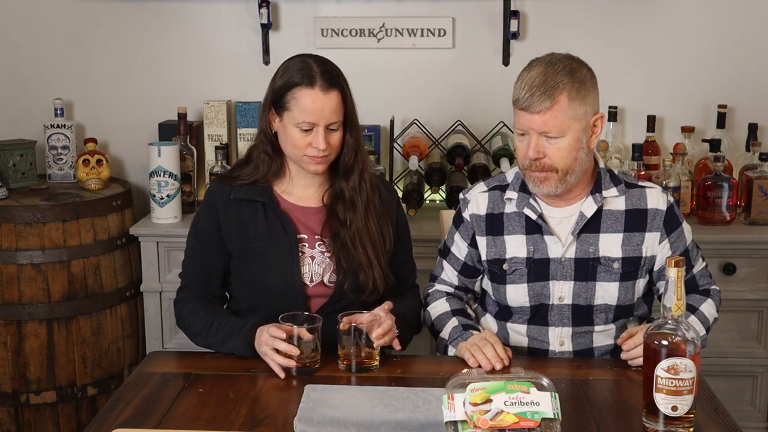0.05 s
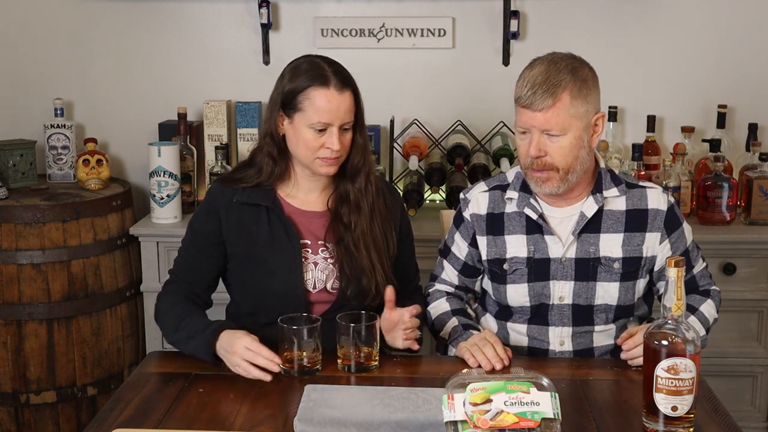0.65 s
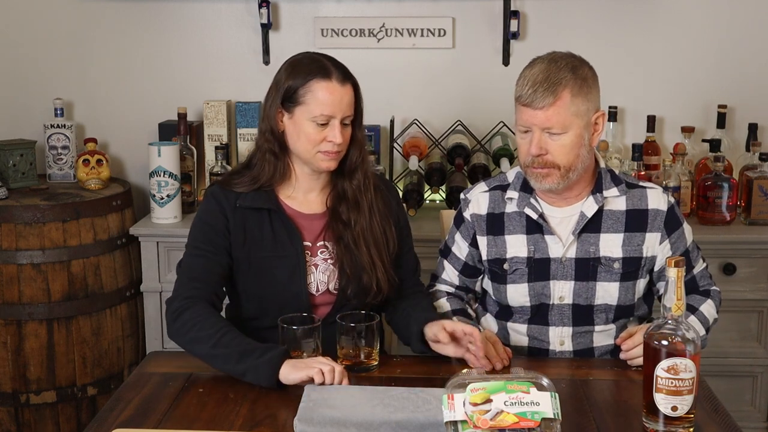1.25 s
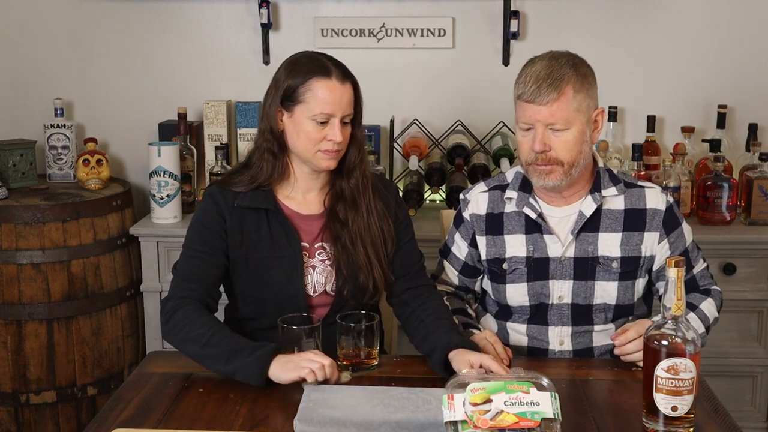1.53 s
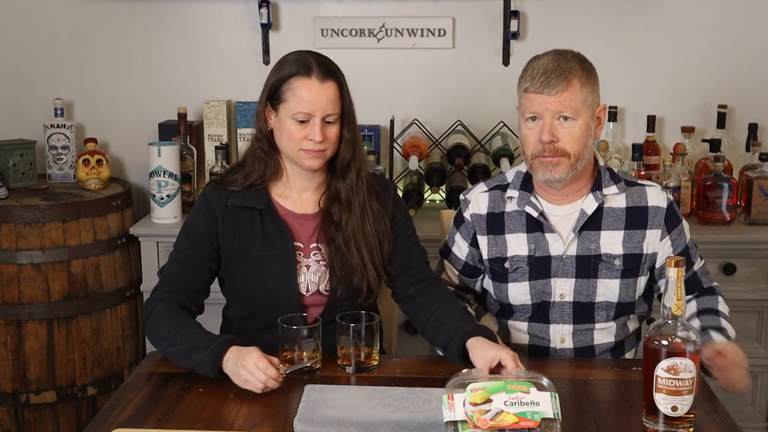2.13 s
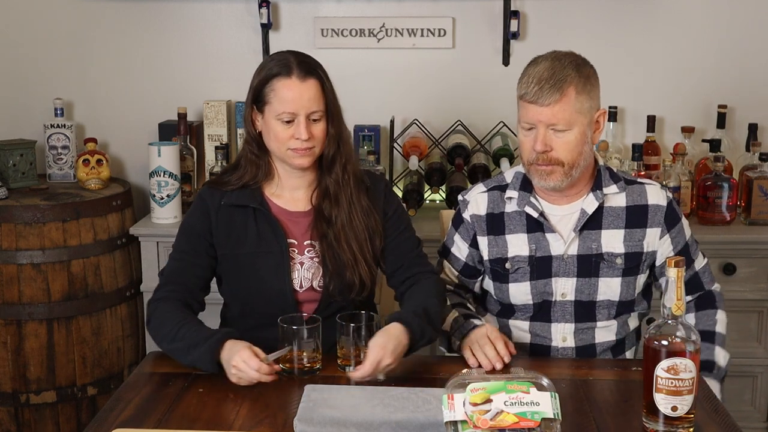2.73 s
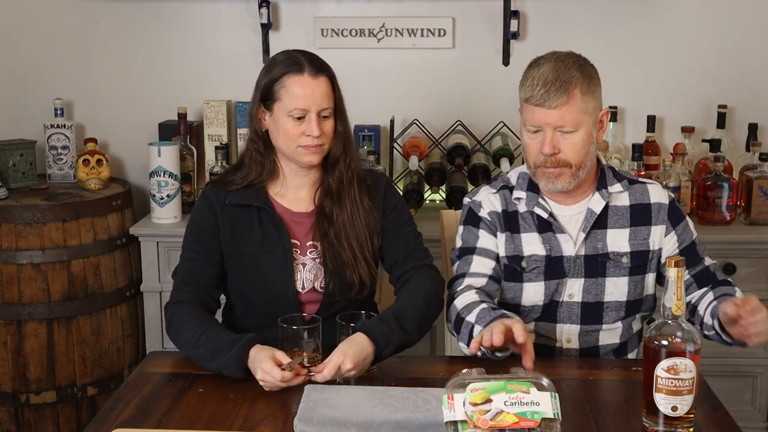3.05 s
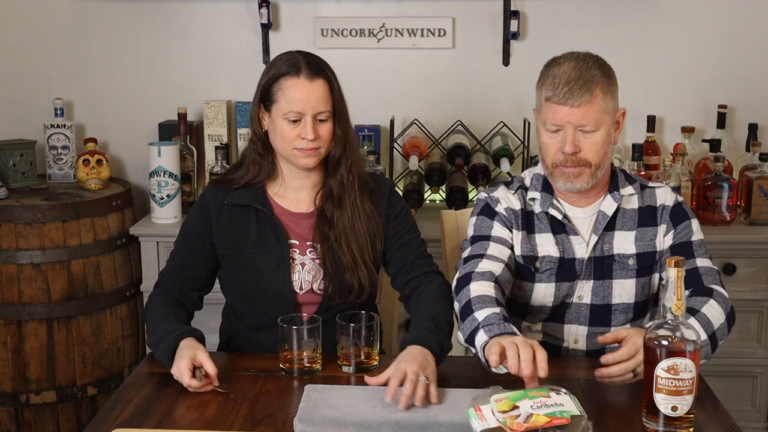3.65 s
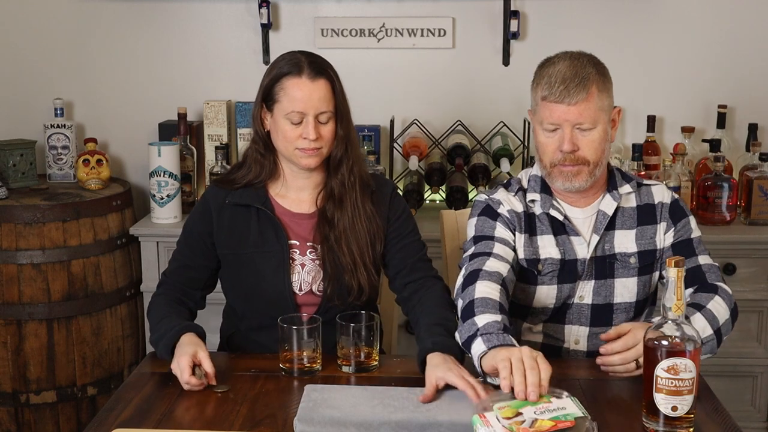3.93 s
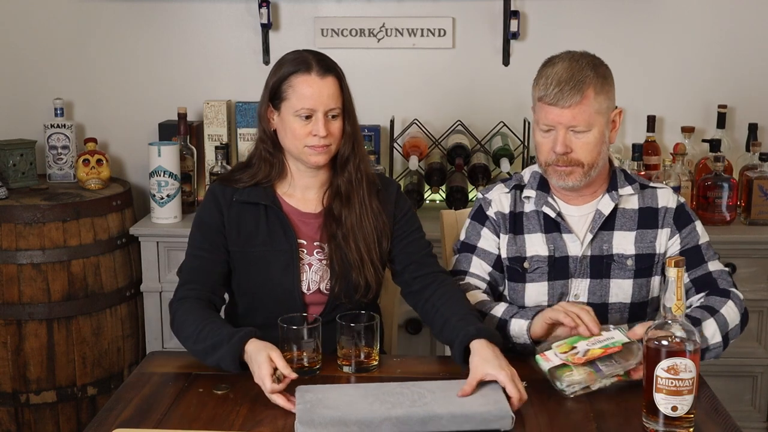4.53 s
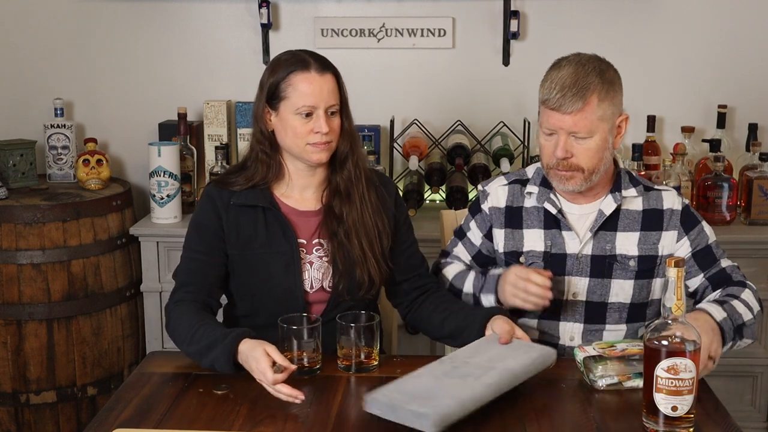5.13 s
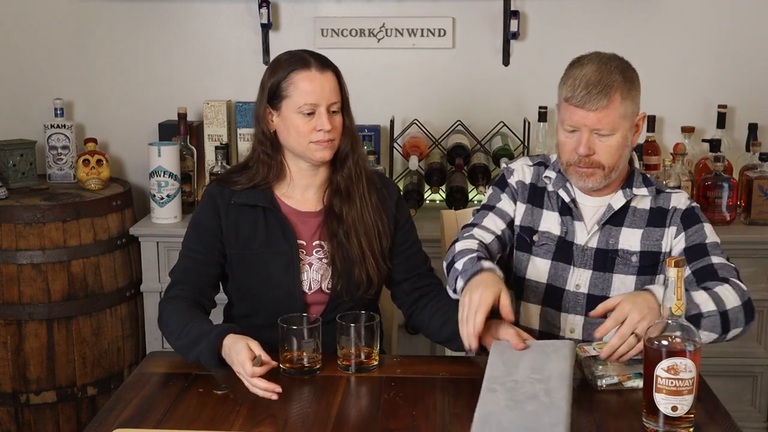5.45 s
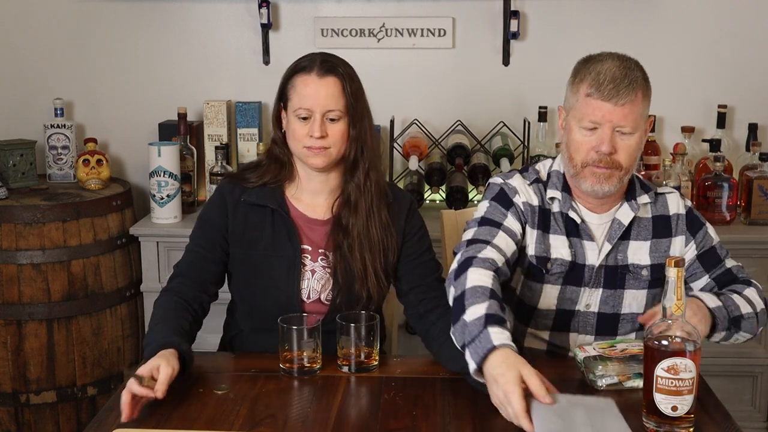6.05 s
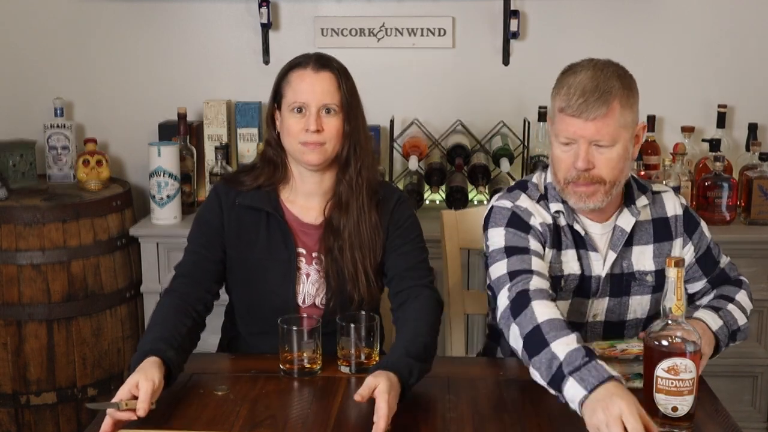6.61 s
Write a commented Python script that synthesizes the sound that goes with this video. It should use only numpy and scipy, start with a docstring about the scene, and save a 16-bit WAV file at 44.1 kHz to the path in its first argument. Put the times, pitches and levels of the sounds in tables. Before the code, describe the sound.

Things are moved around a wooden table in a small, echoing room, heard in mono over a low hum and hiss. First a glass lands with a knock, followed by soft taps and a faint brush of cloth. A plastic tray slaps down and scrapes along as a little coin skips and rings briefly. Finally a board bumps, rasps off the edge and is put down with a low thud.

```python
"""Moving things on a wooden table

In a small, echoing room with a low mains hum, a glass tumbler is set down, a plastic tray is knocked
and dragged, a small coin bounces and rings, and a flat board is turned, slid off the table and put
down with a thud. A knock is one short push that makes a thing ring; a slide is a stream of tiny slips."""
import sys
import numpy as np
from scipy import signal
from scipy.fft import rfft, irfft
from scipy.io import wavfile

SR = 44100
rng = np.random.default_rng(int(sys.argv[2]) if len(sys.argv) > 2 else 0)


def wav_record(signal):
    """Record a signal, one row per channel, as 16-bit PCM in the file named by sys.argv[1]."""
    frames = np.transpose(np.atleast_2d(signal))
    bounded = np.clip(frames, -1, 1)
    # unit amplitude maps onto the largest positive 16-bit level
    quanta = np.round(bounded * 32767).astype(np.int16)
    wavfile.write(sys.argv[1], SR, quanta)


N = 298865
T = np.arange(N) / SR


def undb(db):
    """Turn decibels into a number to multiply by."""
    return 10 ** (np.asarray(db) / 20)


def unit(x):
    """Scale a sound to an energy of one."""
    return x / np.sqrt(np.sum(x ** 2) + 1e-18)


def level(x, db):
    """Scale a sound to an average (rms) level."""
    return unit(x) * np.sqrt(len(x)) * undb(db)


def add(out, start_s, x):
    """Mix x into out at the given time."""
    i = max(int(start_s * SR), 0)
    out[i:i + len(x)] += x[:max(N - i, 0)]


def at_hz(points, hz):
    """Read between (frequency, value) points, with octaves evenly spaced."""
    known_hz, values = np.transpose(points)
    return np.interp(np.log(np.maximum(hz, 1)), np.log(known_hz), values)


def colour(x, points, tilt=0, size=8192):
    """Give a sound a tone colour: a level for each frequency, brightened by tilt dB per octave."""
    hz = np.fft.rfftfreq(size, 1 / SR)
    octaves = np.log2(np.clip(hz, 150, 10000) / 1000)
    cepstrum = irfft(np.log(undb(at_hz(points, hz) + tilt * octaves)))
    # folding this in half keeps the filter from sounding before it is pushed
    cepstrum[1:size // 2] *= 2
    cepstrum[size // 2 + 1:] = 0
    response = irfft(np.exp(rfft(cepstrum)))
    return signal.fftconvolve(x, response)[:len(x)]


def even_noise(envelope):
    """Random chatter that favours no pitch and follows a loudness curve."""
    spectrum = rfft(rng.standard_normal(len(envelope)) * envelope)
    flat = irfft(spectrum / (abs(spectrum) + 1e-12), len(envelope))
    return unit(flat * np.sqrt(envelope))


def ring(push, body, modes, tilt):
    """A pushed thing gives a brief burst of its body's colour and a few ringing notes, its modes."""
    t = T[:len(push)]
    out = unit(colour(push, body, tilt))
    for hz, db, fade_s in modes:
        mode = np.sin(2 * np.pi * hz * t) * undb(-60 * t / fade_s)  # a fade time is a fall of 60 dB
        note = unit(signal.fftconvolve(push, mode)[:len(t)])
        out += undb(db + tilt * np.log2(hz / 1000) / 2) * note
    return unit(out)


def room(x, wet_db, gap_s=.005, early_db=-3, early_s=0.0068):
    """Add quick echoes from table and walls, and a tail whose treble dies first; wet_db sets how much."""
    # how long the room echoes (frequency [Hz], fade time [s])
    fade_times = [(100, 0.94), (300, 0.43), (900, 0.58), (3000, 0.42), (7000, 0.46), (15000, 0.078)]
    hz, times, cells = signal.stft(rng.standard_normal(SR), SR, nperseg=256)
    fade = undb(-60 * times / at_hz(fade_times, hz)[:, None])
    tail = signal.istft(cells * fade, SR)[1][:SR]
    early = undb(early_db) * even_noise(np.exp(-T[:SR] / early_s))
    echo = unit(unit(tail) + early)
    out = x.copy()
    add(out, gap_s, undb(wet_db) * signal.fftconvolve(x, echo)[:N])
    return out


def blows(rows, contact):
    """Give each knock its contact time: harder blows are shorter."""
    return [(s, db, tilt, np.interp(db, *np.transpose(contact))) for s, db, tilt in rows]


def edge_first(rows, lead_s, tick_db, tick_tilt, tick_ms):
    """A thing never lands quite flat: its edge ticks, softer and brighter, just before each blow."""
    return rows + [(s - lead_s, db + tick_db, tilt + tick_tilt, tick_ms) for s, db, tilt, _ in rows]


def knocks(rows, body, modes, click_db, bunching=1, scatter=0):
    """Each knock is one clean click followed by a moment of chatter as the surfaces settle."""
    out, t = np.zeros(N), T[:SR // 2]
    for s, db, tilt, contact_ms in rows:
        age = 1000 * t / max(contact_ms, .2)
        push = even_noise((age * np.exp(1 - age)) ** bunching)
        push[0] += undb(click_db)
        # scatter: landing on a new spot each time brings out slightly different notes
        here = [(hz * np.exp(scatter * rng.standard_normal()), *rest) for hz, *rest in modes]
        add(out, s, undb(db) * np.sqrt(SR / 100) * ring(push, body, here, tilt))
    return out


def slides(rows, body, modes, grain_db, slips_per_s):
    """Rubbing: a swell of tiny slips shakes the thing; more grain_db makes their sizes more unequal."""
    out = np.zeros(N)
    for s, rise, fall, db, tilt in rows:
        speed = np.interp(T[:SR], [0, rise, rise + fall], [0, 1, 0])
        slips = (rng.random(SR) < slips_per_s / SR) * rng.choice([-1, 1], SR)
        sizes = undb(grain_db * np.minimum(rng.exponential(size=SR), 4))
        rub = ring(speed * slips * sizes, body, modes, tilt)
        add(out, s, undb(db) * np.linalg.norm(speed) * rub)
    return out


def rumble(noise, rest_db=-51.5, rise_s=0.072, fall_s=0.093):
    """A very deep rumble that swells with each large movement."""
    # colour of the rumble (frequency [Hz], level [dB])
    depths = [(10, -15), (20, 13), (28, -10), (45, 0), (90, -62), (500, -88)]
    # the movements (time of peak [s], level [dB])
    movements = [(.22, -48), (3.48, -40), (3.75, -37), (4.27, -36), (5.0, -41), (5.36, -39), (5.92, -28.5),
                 (6.35, -28), (6.54, -21.5), (6.74, -17)]
    swells = sum(undb(db) * np.exp(-((T - s) / np.where(T < s, rise_s, fall_s)) ** 2)
                 for s, db in movements)
    return level(colour(noise, depths), 0) * (undb(rest_db) + swells)


def background(hum_hz=120.1, hum_db=-45.5, drone_db=-53, air_db=-53):
    """Mains hum with a wavering drone around it, the deep rumble and a steady hiss of air."""
    # colours of the air and the drone (frequency [Hz], level [dB])
    air_colour = [(94, -11), (160, -5), (226, -3), (258, -7.5), (284, -6), (393, -6), (555, -10.5),
                  (814, -11.5), (1590, -16.5), (2720, -19), (15500, -26.5)]
    drone_colour = [(25, -54), (55, 2.5), (90, -3.5), (118, -3.5), (150, -12), (260, -14),
                    (500, -24.5), (2000, -64)]
    noise = rng.standard_normal((3, N))
    hum = level(np.sin(2 * np.pi * hum_hz * T), hum_db)
    drone = level(colour(noise[0], drone_colour), drone_db)
    air = level(colour(noise[2], air_colour), air_db)
    return hum + drone + rumble(noise[1]) + air


def sleeve():
    """Cloth brushes past as an arm draws back."""
    # the brush (start [s], rise [s], fall [s], level [dB], brightness [dB/octave])
    strokes = [(2.72, 0.13, 0.065, -53.5, 0)]
    # colour of rubbed cloth (frequency [Hz], level [dB])
    cloth = [(500, -10), (2000, 3.5), (4000, 1), (8000, -8), (14000, -18)]
    return room(slides(strokes, cloth, [], grain_db=-1, slips_per_s=14000), wet_db=-8)


def coin(low_hz=10292, high_hz=13030, fade_s=0.4, grip_s=0.0073, tumble_hz=27, tumble_depth=0.29):
    """Each bounce raps the table, stops the coin's old ring and starts its two high notes afresh."""
    # the bounces (time [s], rap level [dB], low note level [dB], high note level [dB])
    bounces = [(3.9, -36, -70, -70), (3.9132, -18, -46, -48), (3.981, -20, -41, -40),
               (4.028, -20.5, -34, -49), (4.072, -22, -38, -47), (4.11, -26.5, -60, -59),
               (4.149, -20.5, -31, -45), (4.1782, -26.5, -38, -45), (4.202, -24.5, -52, -60)]
    # colour of a rap (frequency [Hz], level [dB])
    body = [(180, -21), (320, -12), (650, -2), (800, 0), (960, 8), (1350, -4.5), (1700, 4), (2300, 4.5),
            (2900, 9.5), (3800, -3), (5200, -6), (7000, -9), (9700, -12.5), (15500, -60)]
    # notes of the rapped table (frequency [Hz], level [dB], fade time [s])
    modes = [(883, -46, .08), (2360, -30, .03), (2970, -13, 0.022), (3560, -8, 0.016), (6700, -15.5, 0.035)]
    low, high = np.zeros((2, N))
    t = T[:SR // 2]
    starts = [row[0] for row in bounces]
    flights = np.diff(starts + [starts[-1] + fade_s])
    for (s, _, low_db, high_db), flight in zip(bounces, flights):
        onset = 1 - np.exp(-t / grip_s)
        stop = np.exp(-np.maximum(t - flight, 0) / grip_s)
        envelope = onset * undb(-60 * t / fade_s) * stop
        add(low, s, undb(low_db) * envelope)
        add(high, s, undb(high_db) * envelope)
    tone = low * np.sin(2 * np.pi * low_hz * T) + high * np.sin(2 * np.pi * high_hz * T)
    # the disc turns its face to and from the listener
    tone *= 1 + tumble_depth * np.sin(2 * np.pi * (tumble_hz * T + rng.random()))
    # all bounces are equally brief; harder ones are brighter
    usual_db, usual_tilt, tilt_per_db, contact_ms = -19.5, -1.5, 0.47, 2.67
    landings = [(s, db, usual_tilt + tilt_per_db * (db - usual_db), contact_ms) for s, db, *_ in bounces]
    raps = knocks(landings, body, modes, click_db=-4, bunching=1.26, scatter=0.058)
    return room(tone, wet_db=-12) + room(raps, wet_db=-3.5, gap_s=.01, early_db=-25)


def tumbler():
    """A heavy glass lands on the wood; later come a light slide and two soft knocks."""
    # the knocks (time [s], level [dB], brightness [dB/octave])
    taps = [(.1415, -13.5, 3), (.152, -22.5, 1.5), (.24, -24.5, -5), (1.272, -32, 4), (1.395, -36, -.5)]
    # a soft and a hard blow (level [dB], contact time [ms])
    contact = [(-23, 9.5), (-15, 0.78)]
    # the slide (start [s], rise [s], fall [s], level [dB], brightness [dB/octave])
    strokes = [(.9, 0.19, 0.13, -44, 0)]
    # colours of glass knocking and rubbing on wood (frequency [Hz], level [dB])
    body = [(50, -14), (90, -6), (125, 8), (190, -2.5), (310, 5.5), (450, 6), (650, 1), (950, -5.5),
            (1350, -12), (1750, -15.5), (2150, -31), (3100, -41), (4000, -39), (5000, -68), (12000, -94)]
    rub_colour = [(110, -26), (180, -8.5), (290, -2), (497, -0.5), (662, -7.5), (895, -5), (1920, -15),
                  (2210, -7), (2720, -20.5), (3730, -20.5), (8000, -33), (10400, -66), (17600, -120)]
    # notes of the glass on the table (frequency [Hz], level [dB], fade time [s])
    modes = [(126.6, -7.5, 0.56), (360, -3, 0.031), (920, -31, 0.084), (1855, -27, 0.11),
             (3740, -41, 0.051)]
    landings = edge_first(blows(taps, contact), lead_s=0.00222, tick_db=-11.5, tick_tilt=3.3, tick_ms=0.3)
    hits = knocks(landings, body, modes, click_db=-13)
    rub = slides(strokes, rub_colour, [], grain_db=2.5, slips_per_s=2300)
    return room(hits + rub, wet_db=-1)


def board():
    """The board is turned on the table, rasps over its edge and lands below with a dull thud."""
    # knocks on the table, then the landing (time [s], level [dB], brightness [dB/octave])
    taps = [(4.573, -21, 0.5), (5.2, -29, -1), (5.213, -26.5, -.5), (5.229, -30.5, 2), (5.613, -29, -2.5),
            (5.638, -30.5, -5.5), (5.672, -43, 4), (6.251, -24, -3), (6.2575, -21, -7), (6.275, -23, -1.5),
            (6.607, -37.5, -2), (6.716, -28, -1.5)]
    landings = [(6.678, -12.5, 0.1), (6.696, -13.5, 0.3), (6.73, -19, -0.5)]
    # a soft and a hard blow of each kind (level [dB], contact time [ms])
    contact = [(-38, 4.6), (-28.5, 2.35)]
    thud_contact = [(-22, 3), (-7.5, 2)]
    # slides on the top and the edge (start [s], rise [s], fall [s], level [dB], brightness [dB/octave])
    strokes = [(4.9, 0.024, 0.45, -49.5, -0.09), (5.2, 0.026, 0.033, -31, -1.2),
               (5.26, 0.07, 0.072, -48.5, 0)]
    edge_strokes = [(5.75, 0.34, 0.35, -60, 16), (6.275, 0.0057, 0.097, -27.5, 2.5),
                    (6.29, 0.05, 0.078, -27, 1)]
    # colours of the board, the rasping edge and the thud (frequency [Hz], level [dB])
    body = [(50, -6.5), (110, -11.5), (200, -4.5), (330, 0.5), (450, -1.5), (600, 1.5), (900, -4.5),
            (1500, -8), (2200, -12.5), (3200, -18), (4300, -20), (5400, -29), (8500, -30), (15000, -53)]
    edge_body = [(60, -23), (115, 6), (170, -2), (300, -0.5), (480, -3.5), (900, -3.5), (1300, -7),
                 (2000, -3.5), (2900, -7.5), (3600, -14), (4500, -19), (5600, -30.5), (8000, -35.5),
                 (15500, -61)]
    thud_body = [(15, -25), (30, 5), (70, -9), (120, 7), (220, -1.5), (350, -2), (600, -27.5), (1400, -38),
                 (3000, -39), (6000, -48), (12000, -100)]
    # notes of the board and the thud (frequency [Hz], level [dB], fade time [s])
    modes = [(239, -19.5, 0.23), (417, -20.5, 0.13), (588, -22.5, 0.029), (1314, -27, 0.15),
             (1540, -38, 0.052)]
    thud_modes = [(77.5, -3.5, 0.28), (188, -33, .2), (337, -31, .15)]
    hits = knocks(blows(taps, contact), body, modes, click_db=-10)
    rub = slides(strokes, body, modes, grain_db=0.5, slips_per_s=2200)
    rasp = slides(edge_strokes, edge_body, [], grain_db=5.5, slips_per_s=5000)
    thuds = knocks(blows(landings, thud_contact), thud_body, thud_modes, click_db=-6.5)
    return room(hits + rub + rasp, wet_db=-1) + room(thuds, wet_db=-5)


def tray():
    """The hollow plastic tray is gripped, slapped on the table and dragged; under load its shell drones."""
    # the knocks (time [s], level [dB], brightness [dB/octave])
    taps = [(3.328, -34, -0.5), (3.39, -39.5, 5.5), (3.561, -8.5, 1.5), (3.574, -10.5, -2.5),
            (3.603, -12, 0), (3.622, -10, -1.2), (3.635, -15, 0.5), (4.486, -31.5, 1.5), (4.566, -28, -1),
            (4.751, -44, -2)]
    # a soft and a hard blow (level [dB], contact time [ms])
    contact = [(-36, 5.5), (-28, 2.26)]
    # slides and droning drags (start [s], rise [s], fall [s], level [dB], brightness [dB/octave])
    strokes = [(3.33, 0.044, 0.24, -35.5, 0.1), (3.89, 0.21, 0.18, -33, 3.5), (4.12, 0.077, 0.14, -30.5, 2),
               (4.3, 0.083, 0.57, -47.5, 2.5), (4.68, 0.055, 0.043, -38, -1.8)]
    drags = [(3.47, 0.12, 0.044, -34, 3), (3.65, 0.045, 0.15, -32, 1.5), (4.48, 0.023, 0.098, -34, -5.5),
             (4.79, 0.032, 0.1, -36, 0)]
    # colours of the tray and its droning shell (frequency [Hz], level [dB])
    body = [(70, -54), (120, -11.5), (200, -5), (300, -0.5), (420, -2), (540, -3), (700, -2), (950, -9.5),
            (1270, -13), (1700, -13), (3000, -20), (4000, -25), (5300, -34.5), (8500, -40), (15500, -60.5)]
    shell_body = [(60, -39), (150, -9.5), (350, -9.5), (540, 4.5), (660, 1.5), (800, -11.5), (1500, -21),
                  (4000, -28.5), (12000, -59)]
    # notes of the tray and its droning shell (frequency [Hz], level [dB], fade time [s])
    modes = [(304, -39, 0.32), (482, -17, 0.03), (622, -17, 0.087), (704, -27, 0.18), (727, -9, 0.085),
             (1270, -19, 0.034)]
    shell_modes = [(686, -27, 0.16), (566, -19, 0.11)]
    landings = edge_first(blows(taps, contact), lead_s=.0018, tick_db=-18.5, tick_tilt=3.7, tick_ms=0.4)
    hits = knocks(landings, body, modes, click_db=-7)
    rub = slides(strokes, body, modes, grain_db=1.5, slips_per_s=860)
    drone = slides(drags, shell_body, shell_modes, grain_db=3.5, slips_per_s=1500)
    return room(hits, wet_db=-2, gap_s=0.0036) + room(rub + drone, wet_db=-2.5)


def scene():
    """Mix everything into one channel."""
    return (tumbler() + tray() + coin() + board() + sleeve() + background())[None]


def record(dry):
    """Stop peaks at full scale and cut the highest treble."""
    top_hz = 15850
    lowpass = signal.ellip(10, .1, 80, top_hz, fs=SR, output="sos")
    return signal.sosfilt(lowpass, np.clip(dry, -1, 1))


dry = scene()
out = record(dry)
wav_record(out)
```